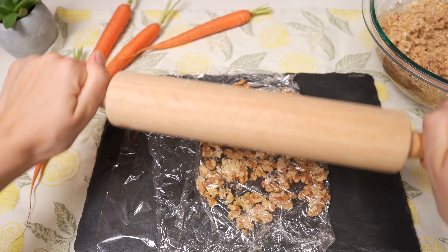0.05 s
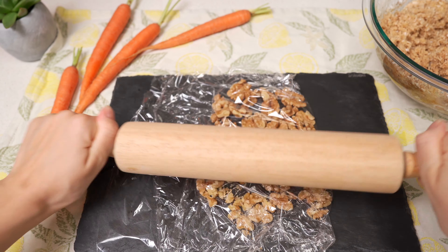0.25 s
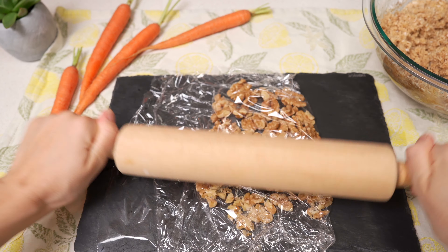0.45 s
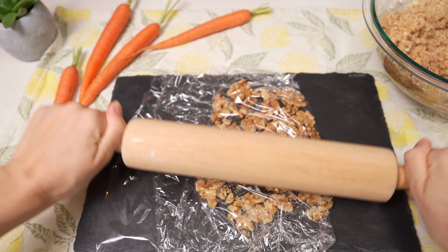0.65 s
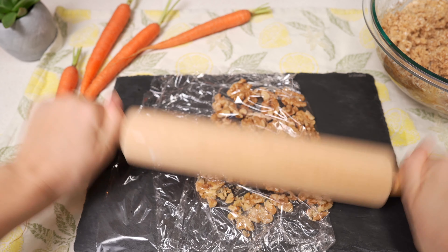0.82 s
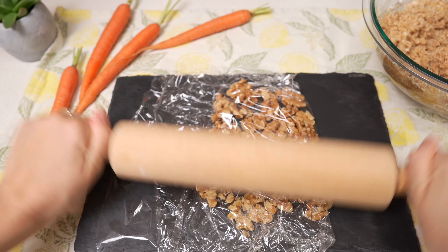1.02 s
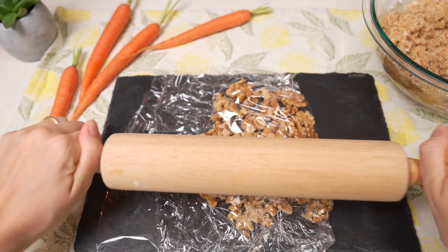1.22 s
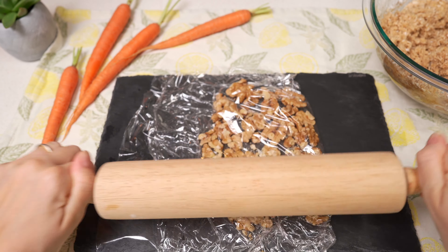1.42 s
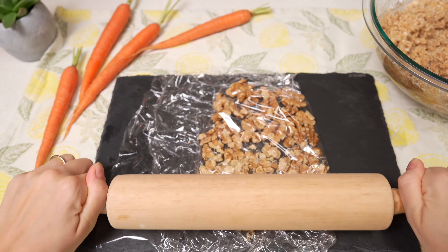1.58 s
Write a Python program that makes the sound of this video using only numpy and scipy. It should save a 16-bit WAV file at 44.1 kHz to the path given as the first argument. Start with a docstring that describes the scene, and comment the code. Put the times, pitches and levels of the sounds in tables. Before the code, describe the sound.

A wooden rolling pin pounds nuts on a hard board, close by in a small kitchen. Seven even blows fall from about 0.2 to 1.6 seconds, each with a crack, a short woody ring and a table thump, while loose handles clack in between. From about 1.8 seconds the pin rolls quietly with faint cling film crackle, giving soft knocks and crunches between 2.0 and 2.3 seconds.

```python
"""A small kitchen, one microphone close to a hard board. A wooden rolling pin pounds nuts under
cling film, seven blows at about 4.3 a second. Each blow cracks nuts, rings pin and board and thumps
the table, where a glass bowl rings faintly; between blows the loose handles clack on their axle.
Then the pin rolls on with soft knocks and crackle."""
import sys
import numpy as np
from scipy import signal
from scipy.fft import rfft, irfft, next_fast_len
from scipy.io import wavfile

SR = 44100
rng = np.random.default_rng(int(sys.argv[2]) if len(sys.argv) > 2 else 0)


def unload_wav(signal):
    """Save mono or channel-first audio to the path in sys.argv[1] as 16-bit WAV at rate SR, clipped to [-1, 1]."""
    wavfile.write(
        sys.argv[1],
        SR,
        np.round(np.clip(np.atleast_2d(signal).T, -1, 1) * 32767).astype(np.int16),
    )


N = 103635
RING_TIME = np.arange(int(.7 * SR)) / SR  # seconds since a contact
CRACK_GRAIN = 0.64  # spread of fracture sizes, in natural-log units

# The blows. Each row: start in seconds, level in dB, table thump in dB, crack brightness in dB per
# octave, first touch in dB, then dB for each of seven main rings, set by where the pin lands.
BLOWS = [(0.2016, 1, 1, 0.82, -14.5, -19.5, 2, 4, 1, 4, 1, 1),
         (0.42, -0.92, 3, -0.25, -18, 5.5, 2.5, 6.5, 2.5, 2.5, 0, -22),
         (0.6748, 1, 1.5, 0.89, -15, 1.5, -6, 9.5, 0.5, 5, -20, -11),
         (.898, -1.6, 1, 0.75, -13.5, 8.5, -0.5, 11, -0.5, -22, -13, 6.5),
         (1.1243, 0.56, 0.8, 0.32, -20, 0, -2.5, 5.5, -8.5, 8.5, 4, -11),
         (1.3503, -1.1, 1, -1.2, -10, 0.5, 4.5, 1, -3.5, 5.5, 1.5, 15.5),
         (1.5817, 0.45, 1, -0.88, -15, 6, 6, -32, -5, 9, 3.5, 3)]
# Modes of pin and board. Each row: frequency in Hz, level in dB, t60 in seconds.
PIN_MODES = [(582, -12, 0.083), (627.7, -16.5, 0.078), (665, -14, 0.047), (852.4, -18, 0.033),
             (1091, -15, 0.1), (1355.5, -25.5, 0.075), (1550, -17.5, 0.068), (1985, -35.5, 0.12),
             (2162, -34.5, 0.17), (2880, -11, 0.1), (3318, -29, 0.15), (3874, -24, 0.067),
             (4620, -27.5, 0.087), (5344, -31, 0.13), (5523, -19.5, 0.072), (6450, -24.5, 0.092),
             (7150, -33, 0.072), (8930, -22, 0.036)]
# Small pieces crunching. Each row: frequency in Hz, spectral level in dB, t60 in seconds.
CRUNCH = [(150, -9.5, 0.32), (340, 20, 0.02), (615, -7.5, 0.038), (1210, -9, .06), (2180, -7, 0.13),
          (4270, -6, 0.17), (7600, -1.5, 0.24), (11200, -7.5, 0.11), (16300, -36, 0.18)]


def pin_blows():
    """Nuts give way, the pin lands and settles; returns the cracks and the ring of pin and board."""
    # Nuts cracking on the board. Each row: frequency in Hz, spectral level in dB, t60 in seconds.
    crack_bands = [(102, -6, 0.04), (202, 9.5, 0.04), (358, 1.5, 0.088), (740, 4.5, 0.04), (1330, -1, 0.15),
                   (2130, -7, 0.09), (2780, -2.5, 0.087), (4630, -6, 0.056), (7720, -2.5, 0.05),
                   (11880, -13, 0.02), (16500, -35, 0.042)]
    # The pin settles through the nuts. Each row: delay after the blow in seconds, level in dB.
    contacts = [(0, -2), (.0035, -4), (.0075, -8.5)]
    # The seven main rings of pin and board, in Hz.
    main_rings_hz = [600, 1085, 1561, 2872, 5518, 6463, 8845]
    crack_db, touch_lead_s = -11.5, 0.00088  # the top nuts give way just before the pin lands
    snap, swell = rise(.0008), rise(0.0027)  # the nuts cushion the blow, so the ring builds up
    cracks, rings = np.zeros(N), np.zeros(N)
    for start, db, _, bright_db, touch_db, *rings_db in BLOWS:
        add(cracks, start - touch_lead_s, undb(db + crack_db + touch_db) * snap * burst(CRUNCH))
        wood = ring(PIN_MODES, lambda hz: np.interp(np.log(hz), np.log(main_rings_hz), rings_db))
        add(rings, start, undb(db) * swell * wood)
        for lag, contact_db in contacts:
            crack = shape(burst(crack_bands), lambda hz: bright_db * np.log2((hz + 100) / 2000))
            add(cracks, start + lag, undb(db + crack_db + contact_db) * snap * crack)
    return cracks, rings


def table_thumps():
    """The table thumps under each blow and stirs the bowl; it thumps softly when its load changes."""
    # Modes of the table, then of the glass bowl. Each row: frequency in Hz, level in dB, t60 in seconds.
    table_modes = [(39, -43.5, 0.43), (59, -28.5, .16), (101.2, -20, 0.088), (136.5, -23.5, 0.18),
                   (156.6, -30, 0.29), (206, -25.5, 0.175)]
    bowl_modes = [(2905, -45.5, 0.73), (3386, -49, 0.4), (4690, -42.5, 0.35)]
    # Dense shudder of the table top. Each row: frequency in Hz, spectral level in dB, t60 in seconds.
    shudder_bands = [(30, -7, .2), (87.6, 12.5, 0.31), (142, 6.5, 0.23), (250, -18, 1), (415, -6, 0.28),
                     (1500, -42, 0.11)]
    # The hands shift the board. Each row: start in seconds, level in dB.
    shifts = [(0.06, -11.5), (0.156, -9), (0.631, -1), (1.729, -5), (2.149, -10)]
    lag_s, shudder_db, soft_hz = 0.0028, -26, 87
    lift_s, lift_db = .077, -13  # the table springs back as the pin is lifted
    swell = rise(0.0068)
    thump = swell * (ring(table_modes) + ring(bowl_modes))
    nudge = swell * ring(table_modes, lambda hz: -10 * np.log10(1 + (hz / soft_hz) ** 4))
    out = np.zeros(N)
    for start, _, thump_db, *_ in BLOWS:
        shudder = undb(shudder_db) * swell * burst(shudder_bands, grain=0)
        add(out, start + lag_s, undb(thump_db) * (thump + shudder))
        add(out, start + lift_s, undb(thump_db + lift_db) * nudge)
    for start, db in shifts:
        add(out, start, undb(db) * nudge)
    return out


def loose_handles():
    """The axle chatters in the bore as the pin is lifted and swung down."""
    # Each row: start in seconds, level in dB, brightness in dB per octave, axle ring in dB.
    clacks = [(0.1226, -19.5, -0.5, -3), (.1343, -14.5, -2.5, -3), (.279, -10.5, 0, 3.5),
              (0.2835, -5.5, -2, -18), (0.288, -8, -2, -6), (0.302, -26.5, 5, 5), (0.3725, -5, 4.5, -5),
              (0.3758, 2.5, -0.5, 0), (0.4946, -8.5, 0.5, 2), (0.5, -15.5, -2.5, -16),
              (0.5947, -10, -2.5, -4), (0.6003, -31, -14.5, -29), (0.8349, -1.5, 0, -2.5),
              (1.061, -7.5, 1.5, 4.5), (1.0673, -2.5, -2, 1), (1.0706, -7, -2.5, -6), (1.199, 0.5, 1.5, -8),
              (1.2034, -13.5, 2, -26), (1.2124, -13.5, 1, 1), (1.2927, -10.5, 2, -5), (1.2978, -9, -7, 7),
              (1.2989, -8, 2.5, 4.5), (1.3042, -5.5, -1, 3.5), (1.4357, -16, -10.5, -5),
              (1.4427, -15.5, -2, -30), (1.5186, -16, -7, -1), (1.522, -9, -1.5, 1), (1.528, -34, -3, -10)]
    # Modes of the handles, then of the axle. Each row: frequency in Hz, level in dB, t60 in seconds.
    handle_modes = [(1040, -30, 0.061), (1275, -19.5, 0.044), (1440, -26.5, 0.052), (1750, -24.5, 0.019),
                    (2700, -109, 0.01), (2825, -21, 0.062), (2980, -59, 0.034), (4960, -28.5, 0.051),
                    (6850, -40.5, 0.085), (9330, -39.5, 0.047)]
    axle_modes = [(2650, -12.5, 0.076)]
    # Contact noise. Each row: frequency in Hz, spectral level in dB, t60 in seconds.
    tick_bands = [(200, -14, 0.046), (615, -18.5, 0.09), (1200, 8, 0.012), (2160, -4, 0.046),
                  (2723, 15.5, 0.054), (3470, -15.5, 0.097), (8300, -10, 0.028), (11100, -25, 0.018),
                  (16000, -50, 0.018)]
    # What the small handles can radiate. Each row: frequency in Hz, gain in dB.
    radiation = [(100, -26), (300, -4), (550, -7.5), (950, 2), (3000, 0.5), (4000, -1.5), (9000, -0.5),
                 (12000, -9), (16000, -5)]
    out = np.zeros(N)
    for start, db, bright_db, axle_db in clacks:
        tilt = lambda hz: bright_db * np.log2((hz + 100) / 2700)
        handle = ring(handle_modes, tilt, detune=0.0124)
        axle = ring(axle_modes, lambda hz: axle_db)
        tick = undb(-12) * shape(burst(tick_bands, grain=0), tilt)
        add(out, start, undb(db) * (handle + axle + tick))
    return causal_filter(out, radiation)


def rolling_knocks():
    """The rolling pin drops off one nut after another, each time with a soft knock and a crunch."""
    # Each row: start in seconds, knock in dB, crunch in dB, tilt of the upper rings in dB per octave.
    knocks = [(2.029, -33, -40, -3.5), (2.0691, -19, -42, -7.5), (2.087, -37, -28.5, 0.5),
              (2.0915, -13, -27.5, -8), (2.142, -38, -57, 4.5), (2.178, -25.5, -36, 1.5),
              (2.2066, -17.5, -36, -2), (2.271, -27, -36, -5), (2.276, -48, -33.5, -9),
              (2.326, -23.5, -35, 0)]
    # Tone of the knocks and their crunch. Each row: frequency in Hz, gain in dB.
    tone = [(100, -22), (380, -23), (520, 1), (570, 5.5), (660, 1), (800, -1), (1100, 5.5), (1400, 4),
            (2000, -0.5), (2900, -1), (16000, -2.5)]
    attack_s, tilt_from_hz = 0.00049, 594
    out = np.zeros(N)
    for start, knock_db, crunch_db, tilt_db in knocks:
        knock = ring(PIN_MODES, lambda hz: knock_db + tilt_db * np.clip(np.log2(hz / tilt_from_hz), 0, 2))
        add(out, start, rise(attack_s) * knock + undb(crunch_db) * burst(CRUNCH))
    return causal_filter(out, tone)


def film_crinkle():
    """Cling film and crumbs crackle in a dense spray of tiny clicks."""
    # Each row: time in seconds, level in dB.
    levels = [(0, -49.5), (.15, -77), (.8, -59.5), (1.6, -60.5), (1.85, -49.5), (2, -59.5), (2.15, -45.5),
              (2.35, -82)]
    # Each row: frequency in Hz, spectral level in dB.
    spectrum = [(1000, -10), (3000, 1), (8000, 4), (11000, -5.5), (16000, -10)]
    clicks_per_s, scatter_db = 900, 4
    clicks = (rng.random(N) < clicks_per_s / SR) * rng.choice([-1, 1], N)
    sizes = undb(scatter_db * np.clip(rng.standard_normal(N), -2, 2))
    click_tail = fade(t60=0.036) * rng.standard_normal(len(RING_TIME))
    crackle = signal.fftconvolve(clicks * sizes, click_tail)[:N]
    return envelope(levels) * colour(crackle, spectrum)


def pin_rumble():
    """The pin rumbles low on the board."""
    # Each row: time in seconds, level in dB.
    levels = [(0, -46), (.5, -47), (1.6, -46), (1.8, -45.5), (2, -49), (2.15, -43), (2.35, -48.5)]
    # Each row: frequency in Hz, spectral level in dB.
    spectrum = [(20, -26), (45, -17.5), (90, 0.5), (160, 1.5), (330, -8.5), (480, -0.5), (580, 2),
                (850, -11.5), (1100, -15), (2000, -18.5), (2850, -16), (3600, -27), (16000, -48)]
    return envelope(levels) * colour(rng.standard_normal(N), spectrum)


def kitchen(board, rings, clacks):
    """Diffuse reverberation builds up behind the direct sound."""
    # The room's decay. Each row: frequency in Hz, gain in dB, t60 in seconds.
    room_bands = [(60.3, -34.5, 0.46), (150, -20, 0.43), (365, -24, 0.8), (740, -22.5, 0.54),
                  (1480, -15, 0.43), (2940, -14, 0.47), (4850, -18, 0.49), (8000, -25, 0.43),
                  (15800, -9.5, 0.1)]
    # How much of the pin's ring, then of the handles, reaches the room.
    # Each row: frequency in Hz, gain in dB.
    ring_send = [(600, 0.5), (1100, -3), (1560, -1.5), (2900, -5), (3400, -14), (4700, -1.5), (5500, -13.5),
                 (9000, -17)]
    handle_send = [(1000, -6.5), (2300, 5), (2600, -7.5), (2750, -7), (3100, -1), (9000, 3.5)]
    onset_s = 0.031
    build_up = 1 - np.exp(-(RING_TIME / onset_s) ** 2)
    response = build_up * decay_bands(rng.standard_normal(len(RING_TIME)), room_bands)
    response = shape(response / np.linalg.norm(response), lambda hz: level_at(hz, room_bands))
    sent = board + causal_filter(rings, ring_send) + causal_filter(clacks, handle_send)
    return signal.fftconvolve(sent, response)[:N]


def ring(modes, db_at=lambda hz: 0, detune=0):
    """Decaying modes; detune is the share by which their pitch shifts with the point of contact."""
    out = np.zeros(len(RING_TIME))
    for hz, db, t60 in modes:
        pitch_hz = hz * (1 + detune * rng.standard_normal())
        out += undb(db + db_at(hz)) * fade(t60) * np.sin(2 * np.pi * pitch_hz * RING_TIME)
    return out


def burst(bands, grain=CRACK_GRAIN):
    """A dying shower of half-millisecond fractures; smooth noise when grain is 0."""
    n = len(RING_TIME)
    sizes = np.exp(grain * np.clip(rng.standard_normal(n), -2, 2))
    fractures = np.repeat(sizes, SR // 2000)[:n] * rng.standard_normal(n)
    return decay_bands(colour(fractures, bands), bands)


def decay_bands(noise, bands):
    """Let every band of a noise die away at its own rate."""
    spectrum, hz = rfft(noise), np.fft.rfftfreq(len(noise), 1 / SR)
    centres = np.log([row[0] for row in bands])
    out = np.zeros(len(noise))
    for selector, (_, _, t60) in zip(np.eye(len(bands)), bands):
        weight = np.interp(np.log(hz + 1), centres, selector)
        out += irfft(spectrum * weight, len(noise)) * fade(t60)
    return out


def shape(x, db_at):
    """Filter by a smooth gain law in dB."""
    n = next_fast_len(len(x) + 2048)
    hz = np.fft.rfftfreq(n, 1 / SR)
    return irfft(rfft(x, n) * undb(db_at(hz)), n)[:len(x)]


def colour(x, points):
    """Give a sound a spectrum, at unit rms."""
    y = shape(x, lambda hz: level_at(hz, points))
    return y / y.std()


def causal_filter(x, points):
    """Minimum-phase filter through (Hz, dB) points: nothing sounds ahead of a contact."""
    size = 2048
    cepstrum = irfft(np.log(undb(level_at(np.fft.rfftfreq(size, 1 / SR), points))))
    fold = np.r_[1, np.full(size // 2 - 1, 2), 1, np.zeros(size // 2 - 1)]
    response = irfft(np.exp(rfft(cepstrum * fold)))
    return signal.fftconvolve(x, response)[:len(x)]


def level_at(hz, points):
    """Read a table's dB column on a log-frequency axis."""
    rows = np.array(points, float)
    return np.interp(np.log(np.maximum(hz, 1)), np.log(rows[:, 0]), rows[:, 1])


def envelope(points):
    """Gain over time from (seconds, dB) points."""
    return undb(np.interp(np.arange(N) / SR, *np.array(points).T))


def rise(attack_s):
    """Exponential onset."""
    return 1 - np.exp(-RING_TIME / attack_s)


def fade(t60):
    """Ring down by 60 dB in t60 seconds."""
    return np.exp(-np.log(1000) * RING_TIME / t60)


def undb(db):
    """Decibels to gain."""
    return 10 ** (np.asarray(db) / 20)


def add(out, start_s, sound):
    """Mix a sound in at a time."""
    i = max(int(round(start_s * SR)), 0)
    out[i:i + len(sound)] += sound[:max(N - i, 0)]


def scene():
    """Everything sits close and in the centre, with a trace of width in the treble."""
    side_db, side_above_hz = -53.5, 1150
    cracks, rings = pin_blows()
    board = cracks + table_thumps() + rolling_knocks() + film_crinkle() + pin_rumble()
    clacks = loose_handles()
    mid = board + rings + clacks + kitchen(board, rings, clacks)
    quadrature = signal.hilbert(mid, next_fast_len(N)).imag[:N]
    treble = shape(quadrature, lambda hz: -20 * np.log10(1 + (side_above_hz / (hz + 1)) ** 4))
    side = undb(side_db) * treble
    return np.array([mid + side, mid - side])


def record(dry):
    """The recorder thins the deepest bass, rounds the highest peaks and cuts the top."""
    low_cut_hz, top_hz, ceiling = 24.6, 16000, undb(-.8)
    thinned = signal.sosfilt(signal.butter(4, low_cut_hz, "high", fs=SR, output="sos"), dry)
    rounded = thinned / (1 + (thinned / ceiling) ** 4) ** (1 / 4)
    return signal.sosfilt(signal.ellip(10, .2, 80, top_hz, fs=SR, output="sos"), rounded)


dry = scene()
out = record(dry)
unload_wav(out)
```